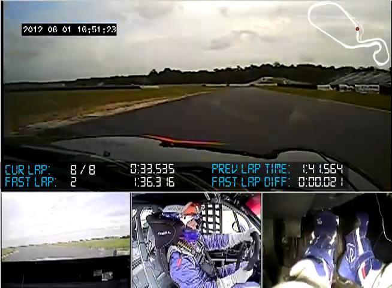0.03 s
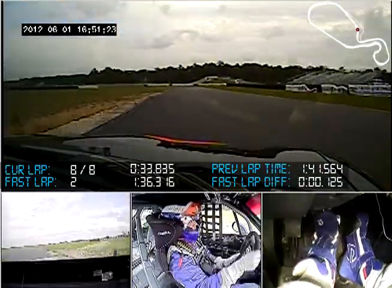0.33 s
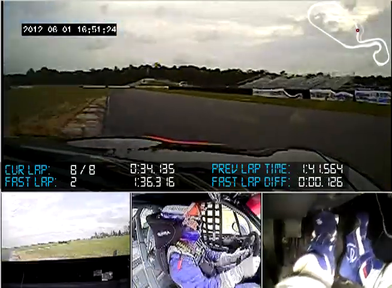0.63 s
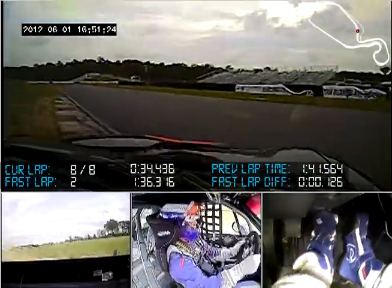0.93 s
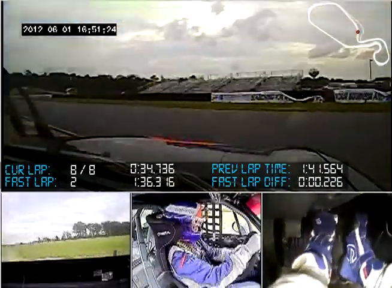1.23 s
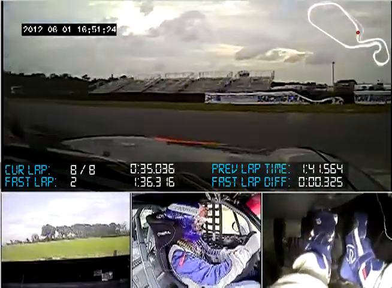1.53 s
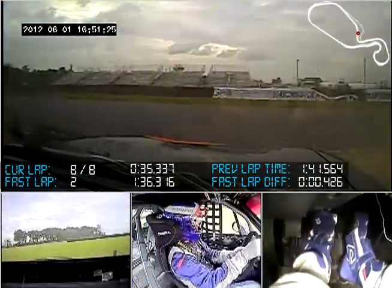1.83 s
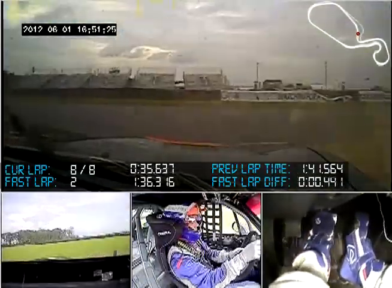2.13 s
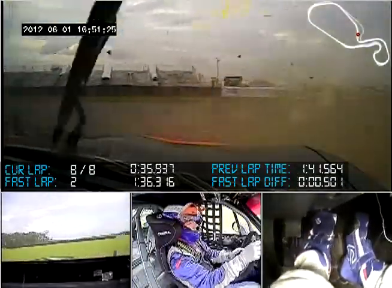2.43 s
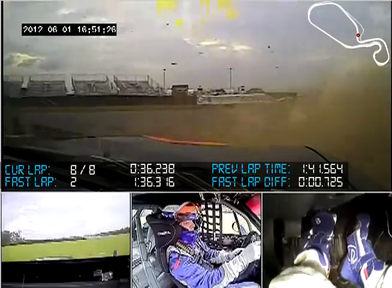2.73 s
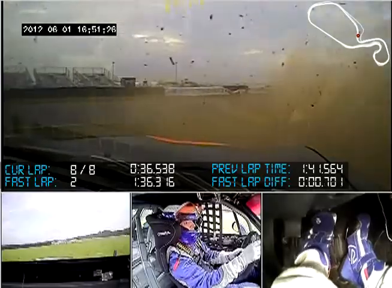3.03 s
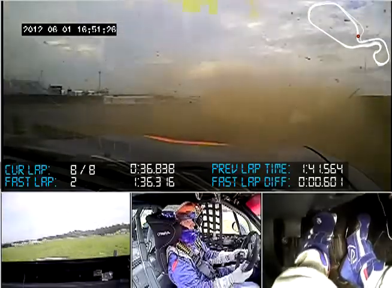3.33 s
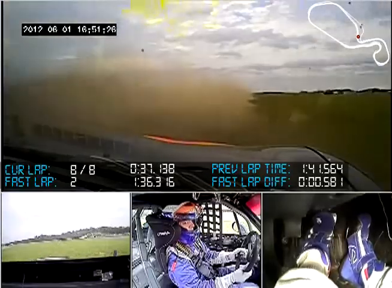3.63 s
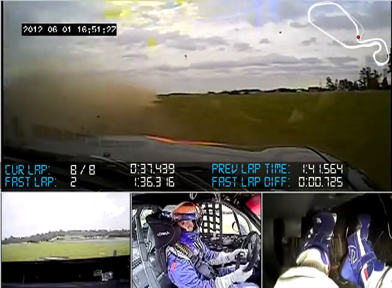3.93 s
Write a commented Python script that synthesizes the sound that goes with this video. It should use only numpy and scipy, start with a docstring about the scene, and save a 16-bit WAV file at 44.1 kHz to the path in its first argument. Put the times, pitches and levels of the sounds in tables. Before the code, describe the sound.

Deep rumbling fills a race car's cabin as it slides off the asphalt. A thin tyre squeal and engine drone lead into a rattling kerb crossing, then spraying soil, stone knocks and thumps that overload the microphone.

```python
"""Inside a race car, the engine drones and a tyre sings in a corner. From about half a second the wheels
drum over a ribbed kerb, forcing the shell into vibration and rattling loose fittings. Then the car slides
onto dirt and grass: soil and grit spray the wheel arches, clods thump the floor, stones knock on the body
and the shell booms over the bumps as the engine note sinks. One cabin microphone hears it all and
overloads on the biggest booms."""
import sys
import numpy as np
from scipy import signal
from scipy.fft import rfft, irfft, next_fast_len
from scipy.io import wavfile
from scipy.ndimage import uniform_filter1d, map_coordinates

SR = 44100
rng = np.random.default_rng(int(sys.argv[2]) if len(sys.argv) > 2 else 0)


def unload_wav(signal):
    """Save mono or channel-first audio to the path in sys.argv[1] as 16-bit WAV at rate SR, clipped to [-1, 1]."""
    wavfile.write(
        sys.argv[1],
        SR,
        np.round(np.clip(np.atleast_2d(signal).T, -1, 1) * 32767).astype(np.int16),
    )


N = 176400
T = np.arange(N) / SR


def amp(db):
    """Decibels to amplitude ratio."""
    return 10 ** (np.asarray(db) / 20)


def unit(x):
    """Normalisation to rms 1."""
    return x / np.sqrt(np.mean(x ** 2) + 1e-20)


def curves(rows):
    """Linear interpolation: one value per sample for each column after the time."""
    times, *columns = np.transpose(rows)
    return [np.interp(T, times, column) for column in columns]


def wobble(knots_per_s):
    """Random modulation: a smooth curve through Gaussian values."""
    return map_coordinates(rng.standard_normal(2000), [T * knots_per_s + 2], mode="mirror")


def noise():
    """White Gaussian noise."""
    return rng.standard_normal(N)


def coloured(x, *spectra):
    """Minimum-phase filtering by cascaded (frequency_hz, gain_db) curves, scaled to rms 1."""
    size = 2 * next_fast_len(N // 2 + SR // 4)
    log_hz = np.log(np.fft.rfftfreq(size, 1 / SR) + 1)
    db = sum(np.interp(log_hz, np.log(hz), gain_db) for hz, gain_db in map(np.transpose, spectra))
    cepstrum = irfft(np.log(amp(db)))
    cepstrum[1:size // 2] *= 2  # folding onto positive time makes the filter causal
    cepstrum[size // 2 + 1:] = 0
    return unit(irfft(rfft(x, size) * np.exp(rfft(cepstrum)))[:N])


def steadied(x, window_s):
    """Division by the running rms evens out chance swells."""
    return x / np.sqrt(np.abs(uniform_filter1d(x ** 2, max(int(window_s * SR), 1))) + 1e-6)


def burst(start_s, hold_s, rise_s, t60_s):
    """Impact envelope: rise, hold and exponential decay."""
    t = np.maximum(T - start_s, 0)
    decay_db = 60 * np.minimum(np.maximum(t - hold_s, 0) / t60_s, 2)
    return (1 - np.exp(-t / rise_s)) * amp(-decay_db)


def grit(grains_per_s=1800, spread_db=1.5, dust_gain=0.5):
    """Shot noise: single grains strike at random over a bed of fine dust."""
    impulses = (rng.random(N) < grains_per_s / SR) * np.sign(noise())
    sizes = amp(spread_db * np.clip(noise(), -2, 2))
    return unit(impulses * sizes) + dust_gain * noise()


def stony_grit(pings_per_s=700, low_hz=1300, high_hz=9000, t60_s=.028, spread_db=18):
    """Damped free vibration: small stones among the grit each ping at their own pitch."""
    grains = grit()
    when, pitch, size = rng.random((int(pings_per_s * N / SR), 3)).T[:, :, None]
    t = np.arange(SR // 25) / SR
    hz = low_hz * (high_hz / low_hz) ** pitch
    rings = amp(spread_db * size) * np.sin(2 * np.pi * hz * t) * amp(-60 * t / t60_s)
    samples = (when * N).astype(int) + np.arange(len(t))
    pings = np.bincount(samples.ravel(), rings.ravel(), N)[:N]
    return grains + amp(-4.5) * unit(pings)


# transmission through wheel arches and cabin: frequency_hz, gain_db
CABIN_RESPONSE = [(200, -6), (650, 3.5), (830, -5), (1120, -25), (1410, -9.5), (1760, -15), (1880, -12.5),
                  (2130, -5), (2480, -13), (2720, -10), (2920, -24.5), (3150, -22.5), (3500, -9.5),
                  (3980, -13), (4250, -24.5), (4550, -25), (4960, -15), (5300, -23), (6600, -22.5),
                  (7800, -36.5), (9450, -32.5), (12500, -41), (15300, -48)]


def through_cabin(x, spectrum):
    """Source and filter: arches and cabin impose their resonances on a source spectrum."""
    return coloured(x, CABIN_RESPONSE, spectrum)


# hum of a body panel: time_s, level_db
PANEL_LEVEL = [(.6, -61), (.75, -33), (1.46, -38), (1.53, -29), (1.63, -40.5), (2.0, -37), (3.3, -57)]


def panel_hum(pitch_hz=323.4):
    """Resonance: a body panel hums at its natural frequency, wavering in phase."""
    return amp(curves(PANEL_LEVEL)[0]) * np.sin(2 * np.pi * pitch_hz * T + 1.13 * wobble(55))


# engine drone: time_s, firing_rate_hz, level_db
ENGINE_COURSE = [(0, 100.4, -36), (.55, 103.6, -41.5), (1.4, 107, -33.5), (2.1, 102.5, -40),
                 (4, 82.4, -54.5)]
# its harmonics: harmonic_number, relative_db
ENGINE_HARMONICS = [(1, -1), (2, -13.5), (3, -19), (4, -23), (5, -14), (6, -13), (7, -19.5)]


def engine():
    """Periodic firing gives a harmonic series, roughened by random pitch and level modulation."""
    firing_hz, level_db = curves(ENGINE_COURSE)
    phase = 2 * np.pi * np.cumsum(firing_hz * (1 + 0.0099 * wobble(30.34))) / SR
    drone = sum(amp(db + 1.14 * wobble(23.85)) * np.sin(k * phase) for k, db in ENGINE_HARMONICS)
    return amp(level_db) * unit(drone)


# singing tyre: time_s, pitch_hz, level_db
SQUEAL_COURSE = [(0, 832, -43), (.12, 813, -46), (.21, 803.5, -37.5), (.42, 815, -39), (.54, 842, -42),
                 (.65, 850, -76)]
# the note, a second tyre and the octave: pitch_ratio, relative_db
SQUEAL_TONES = [(1, 0), (1.112, -8), (2, -10)]
# rough edge of the note: frequency_hz, gain_db
SCRUB_SPECTRUM = [(300, -100), (740, -52), (820, 33), (920, 6), (1000, -18), (2000, -100)]


def tyre_squeal(waver_share=0.0168, scrub_db=-14):
    """Frictional oscillation: scrubbing tyres sing a thin note until they leave the asphalt."""
    pitch_hz, level_db = curves(SQUEAL_COURSE)
    phase = 2 * np.pi * np.cumsum(pitch_hz * (1 + waver_share * wobble(130))) / SR
    note = sum(amp(db + 3.5 * wobble(70)) * np.sin(ratio * phase) for ratio, db in SQUEAL_TONES)
    scrub = amp(scrub_db) * coloured(noise(), SCRUB_SPECTRUM)
    return amp(level_db) * (unit(note) + scrub)


# envelopes of shell boom, wheel roar and tyre hiss: time_s, level_db
BOOM_LEVEL = [(0, -30), (.5, -31.5), (.6, -23.5), (.76, -21), (1.19, -25), (1.28, -20), (1.8, -20.5),
              (1.92, -20), (2.3, -20), (2.5, -21.5), (3.0, -22.5), (3.4, -26), (4, -28)]
ROAR_LEVEL = [(0, -34), (.5, -35.5), (.63, -23), (.93, -26), (1.08, -28), (1.3, -28), (1.5, -30.5),
              (2.6, -29), (3.1, -30.5), (3.35, -28.5), (3.5, -35), (3.62, -33), (3.72, -45), (3.88, -35),
              (4, -42)]
HISS_LEVEL = [(0, -45), (.55, -45.5), (.65, -39.5), (.95, -49), (3.6, -45.5), (3.7, -58)]
# their spectra: frequency_hz, gain_db
BOOM_SPECTRUM = [(12, -27), (25, -9), (34, -0.5), (45, -3), (62, -3), (78, -18), (102, -15), (150, -34.5),
                 (900, -92.5)]
ROAR_SPECTRUM = [(50, 5), (115, 4.5), (270, -2.5), (390, -5), (500, -4), (590, 0.5), (660, 2.5),
                 (780, -7.5), (900, -15), (1100, -23.5), (1500, -28.5), (2400, -36), (8000, -67)]
HISS_SPECTRUM = [(500, 0.5), (1100, 7), (1550, 12.5), (2100, 8), (3600, 4), (7000, 0.5), (12000, -14)]


def rolling():
    """Random excitation in three bands: the shell booms, the wheels roar and the tyres hiss."""
    boom = amp(curves(BOOM_LEVEL)[0]) * steadied(coloured(noise(), BOOM_SPECTRUM), window_s=0.15)
    roar = amp(curves(ROAR_LEVEL)[0] + 0.54 * wobble(40)) * coloured(noise(), ROAR_SPECTRUM)
    hiss = amp(curves(HISS_LEVEL)[0]) * through_cabin(noise(), HISS_SPECTRUM)
    return boom + roar + hiss


# bumps in the ground: centre_s, level_db
GROUND_BUMPS = [(2.06, -13.5), (2.149, -11), (2.457, -11), (2.538, -12), (2.709, -11), (2.905, -11),
                (3.077, -9.5), (3.159, -12.5), (3.32, -16), (3.4, -14.5), (3.602, -17.5), (3.87, -21.5)]


def jolts(shell_hz=44, width_s=.03):
    """Transient response: each bump sets the shell booming for a few cycles."""
    out = np.zeros(N)
    for centre_s, db in GROUND_BUMPS:
        hz = shell_hz * np.exp(.12 * rng.standard_normal())
        swell = amp(db) * np.exp(-((T - centre_s) / width_s) ** 2)
        out += swell * np.sin(2 * np.pi * (hz * T + rng.random()))
    return out


# clicks of loose fittings: start_s, level_db
FITTING_CLICKS = [(0.761, -30), (0.808, -25.5), (0.858, -24), (.876, -25), (0.909, -26), (.929, -22),
                  (1.164, -22), (1.185, -32), (1.214, -30)]
# their spectrum: frequency_hz, gain_db
CLICK_SPECTRUM = [(500, 9), (2000, 5.5), (6500, -3), (15000, -26)]


def loose_fittings():
    """Brief contact gives a broad spectrum: fittings click as the kerb shakes them."""
    strikes = sum(amp(db) * burst(start_s, 0, rise_s=.0001, t60_s=.011) for start_s, db in FITTING_CLICKS)
    return strikes * coloured(noise(), CLICK_SPECTRUM)


# pebbles on glass and panels: start_s, level_db
PEBBLE_HITS = [(0.604, -31), (1.056, -29), (2.928, -32), (3.327, -32.5), (3.609, -35), (3.67, -44),
               (3.867, -50), (3.895, -45)]
# their spectrum: frequency_hz, gain_db
PEBBLE_SPECTRUM = [(1500, -3.5), (5000, 6.5), (13000, 10)]


def pebbles():
    """Hard impacts are rich in treble: single pebbles crack against the car."""
    strikes = sum(amp(db) * burst(start_s, 0, rise_s=.0001, t60_s=.071) for start_s, db in PEBBLE_HITS)
    return strikes * through_cabin(grit(), PEBBLE_SPECTRUM)


# big stones against the body: start_s, pitch_hz, level_db
STONE_HITS = [(2.319, 2227, -22.5), (2.728, 2050, -27.5), (3.05, 2200, -27.5), (3.407, 1685, -28),
              (3.481, 1487, -28.5)]


def stone_knocks():
    """Damped local resonance: a big stone rings the spot it strikes, roughly and briefly."""
    out = np.zeros(N)
    for start_s, hz, db in STONE_HITS:
        clack = unit(np.sin(2 * np.pi * hz * T + wobble(1100)))
        out += amp(db) * burst(start_s, 0, rise_s=.001, t60_s=.064) * clack
    return out


# clods and bumps against the floor: start_s, level_db, hold_s
FLOOR_HITS = [(.886, -20.5, 0.051), (1.242, -26, 0.013), (1.323, -21.5, 0.011), (2.455, -26, 0.019),
              (2.476, -14, 0.0071), (2.744, -21.5, 0.016), (3.26, -18, 0.028), (3.31, -30, 0.0096),
              (3.484, -51, .012)]
# floor pan modes: frequency_hz, bandwidth_hz, gain_db
PAN_MODES = [(361, 43, -6.5), (540, 113, -7), (634, 61, 2), (700, 60, -2.5), (868, 41, -12.5),
             (1410, 430, -27)]


def floor_thumps():
    """Modal superposition: crumbling clods and bumps ring the resonances of the floor pan."""
    hz = np.fft.rfftfreq(N, 1 / SR)
    response = 0
    for k, (mode_hz, bandwidth_hz, db) in enumerate(PAN_MODES):
        damping = 1j * hz * bandwidth_hz
        response += (-1) ** k * amp(db) * damping / (mode_hz ** 2 - hz ** 2 + damping)
    ring = steadied(unit(irfft(rfft(grit()) * response, N)), window_s=0.041)
    power = sum((amp(db) * burst(start_s, hold_s, rise_s=.0016, t60_s=.1)) ** 2
                for start_s, db, hold_s in FLOOR_HITS)
    return ring * np.sqrt(power)


# continuous spray of soil: time_s, level_db
SPRAY_LEVEL = [(.55, -63.5), (.63, -43.5), (.95, -48), (1.01, -52), (1.2, -38), (1.35, -29), (1.47, -45.5),
               (1.6, -34.5), (1.72, -39.5), (1.92, -34), (2.36, -33), (2.6, -31), (2.8, -34.5), (3.0, -39),
               (3.36, -43), (3.46, -64), (3.6, -47), (3.72, -60), (4, -50)]
# showers of grit: start_s, relative_db, hold_s, relative_treble_db
GRIT_SHOWERS = [(1.295, -34, 0.021, 3), (1.412, -31.5, 0.0081, 3), (1.539, -41, 0.0093, 13.5),
                (1.784, -44, 0.019, 15), (1.963, -31.5, 0.016, 12), (2.006, -36, 0.023, 11.5),
                (2.188, -29.5, 0.013, 4.5), (2.275, -35, 0.0064, 13), (2.318, -32, 0.058, 4.5),
                (2.456, -27, 0.032, -1), (2.514, -24.5, 0.028, 3.5), (2.563, -24.5, 0.0038, 2),
                (2.632, -31, 0.025, 3), (2.682, -30.5, 0.016, 3.5), (2.72, -32, 0.013, -19),
                (2.93, -29.5, 0.01, 1), (3.061, -28.5, 0.01, -21), (3.118, -36.5, 0.03, 5.5),
                (3.211, -27.5, 0.013, -5), (3.257, -28.5, 0.012, 1.5), (3.326, -32.5, 0.0092, -1),
                (3.402, -32, 0.014, -7), (3.48, -27, 0.012, -30), (3.796, -47, 0.026, -4),
                (3.862, -39.5, 0.0035, -13)]
# spectra of spray, coarse grit and fine grit: frequency_hz, gain_db
SPRAY_SPECTRUM = [(200, -17), (600, -7), (1000, -3), (1500, -3.5), (15000, 5.5)]
COARSE_SPECTRUM = [(250, -14.5), (700, -2), (1400, -2.5), (2300, -1.5), (3600, -4), (5500, -12),
                   (12000, -27)]
FINE_SPECTRUM = [(1000, -16.5), (3000, -8), (5500, -3.5), (15000, -7)]


def soil(shower_gain_db=0.5, fine_gain_db=-5.5):
    """Incoherent sources add in power: showers of grit hit the arches over a fluttering spray."""
    spray_db = curves(SPRAY_LEVEL)[0] + 2.3 * wobble(55)
    spray = amp(spray_db) * through_cabin(stony_grit(), SPRAY_SPECTRUM)
    coarse_power, fine_power = np.zeros(N), np.zeros(N)
    for start_s, db, hold_s, treble_db in GRIT_SHOWERS:
        power = (amp(db + shower_gain_db) * burst(start_s, hold_s, rise_s=.001, t60_s=.085)) ** 2
        coarse_power += power
        fine_power += power * amp(treble_db + fine_gain_db) ** 2
    coarse = np.sqrt(coarse_power) * through_cabin(stony_grit(), COARSE_SPECTRUM)
    fine = np.sqrt(fine_power) * through_cabin(grit(), FINE_SPECTRUM)
    return spray + coarse + fine


# crossing the kerb: time_s, rib_rate_hz, shake_db, rattle_db
KERB_CROSSING = [(.45, 42.7, -38, -70), (.6, 43.2, -18.5, -47), (.69, 43.2, -22, -48),
                 (.76, 43.2, -14.8, -39), (.865, 43.2, -13.6, -34), (.895, 43.2, -12.7, -23),
                 (.94, 43.2, -12.7, -24), (.99, 35, -18, -45), (1.04, 38.2, -14.7, -46),
                 (1.21, 38.2, -14, -36), (1.4, 38.2, -36, -70)]
# harmonics of the shaking: harmonic_number, relative_db
SHAKE_HARMONICS = [(1, 0), (2, -10.5), (3, -15.5)]
# body rattle: frequency_hz, gain_db
RATTLE_SPECTRUM = [(650, 6.5), (1100, -6.5), (2200, -2.5), (6000, -19.5), (15000, -54)]


def kerb(rattle_sharpness=3):
    """Forced vibration: the shell shakes at the rib rate, and each swing up or down rattles the body."""
    rib_hz, shake_db, rattle_db = curves(KERB_CROSSING)
    phase = 2 * np.pi * np.cumsum(rib_hz * (1 + .006 * wobble(30))) / SR
    shake = unit(sum(amp(db + 0.48 * wobble(30.5)) * np.sin(k * phase) for k, db in SHAKE_HARMONICS))
    swings = unit(np.exp(rattle_sharpness * np.cos(phase) ** 2))  # two peaks a cycle
    rattle = swings * coloured(grit(), RATTLE_SPECTRUM)
    return amp(shake_db) * shake + amp(rattle_db) * rattle


def scene():
    """Superposition: all sources add at one cabin microphone, which feeds both channels."""
    car = rolling() + jolts() + engine() + panel_hum() + tyre_squeal()
    cabin = car + kerb() + loose_fittings() + soil() + pebbles() + floor_thumps() + stone_knocks()
    return np.array([cabin, cabin])


def record(dry):
    """Saturation: big booms clip the input and chop the grit; coupling and a band limit follow."""
    clip_level, coupling_hz, top_hz = .27, 17, 15500
    clipped = dry / (0.5 + np.abs(dry / clip_level) ** 20) ** (1 / 20)
    highpass = signal.butter(1, coupling_hz, "high", fs=SR)
    coupled = signal.lfilter(*highpass, clipped)  # tilts the flat tops
    size = next_fast_len(N + SR // 2)
    passband = np.fft.rfftfreq(size, 1 / SR) < top_hz
    return irfft(rfft(coupled, size) * passband, size)[:, :N]


dry = scene()
out = record(dry)
unload_wav(out)
```